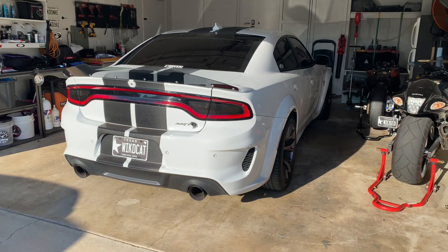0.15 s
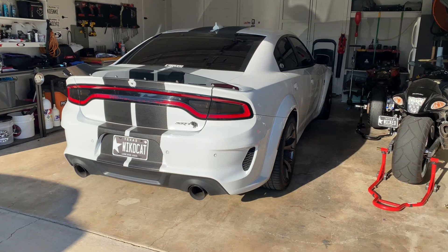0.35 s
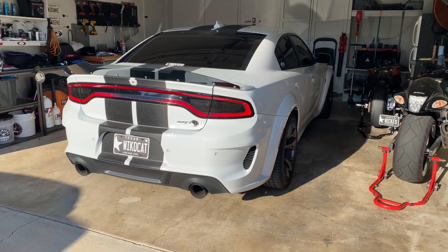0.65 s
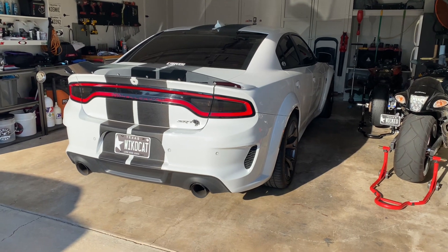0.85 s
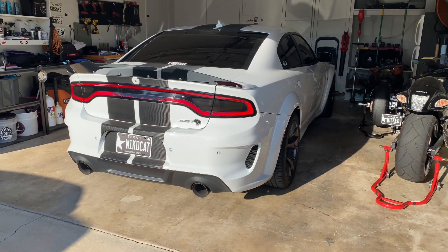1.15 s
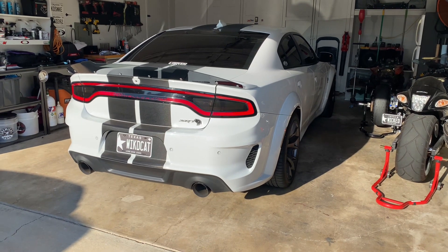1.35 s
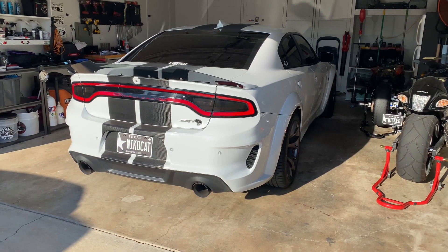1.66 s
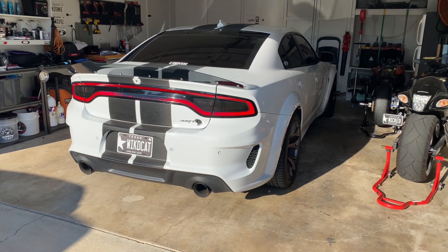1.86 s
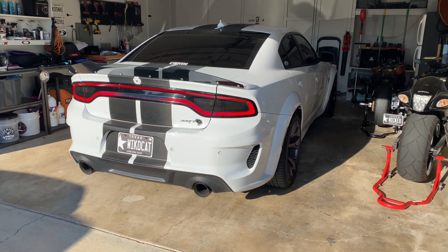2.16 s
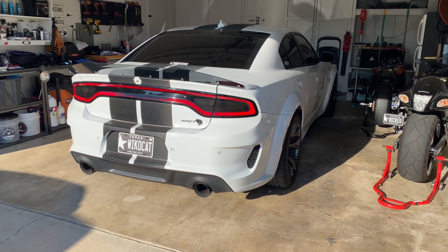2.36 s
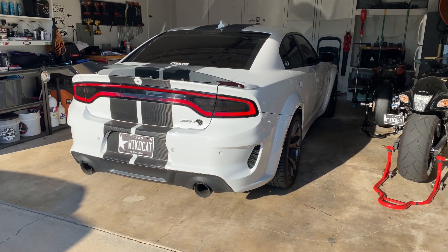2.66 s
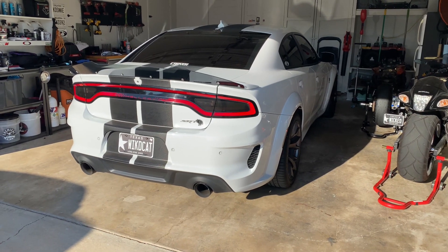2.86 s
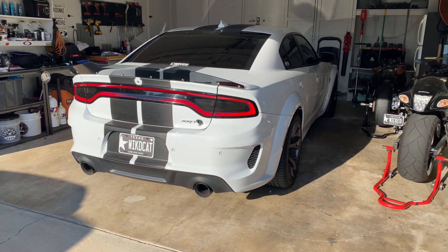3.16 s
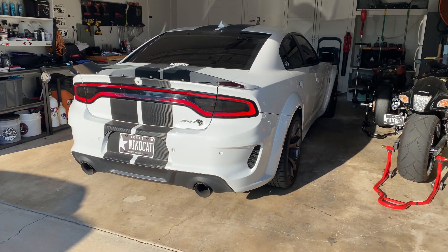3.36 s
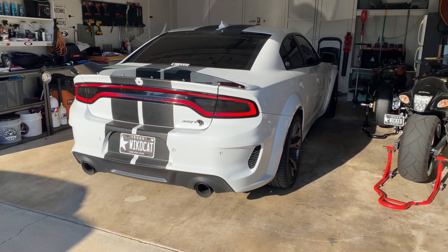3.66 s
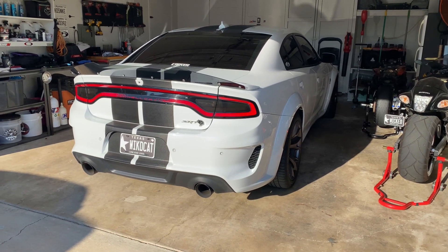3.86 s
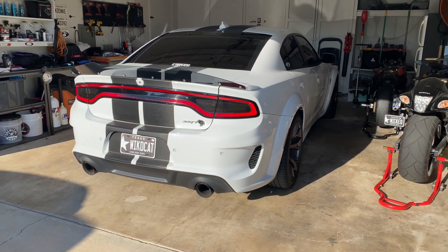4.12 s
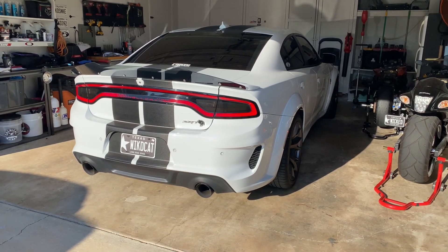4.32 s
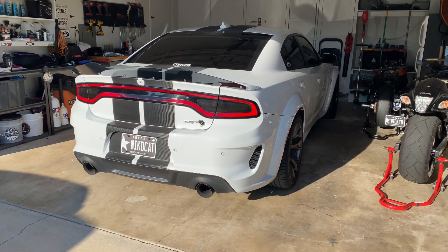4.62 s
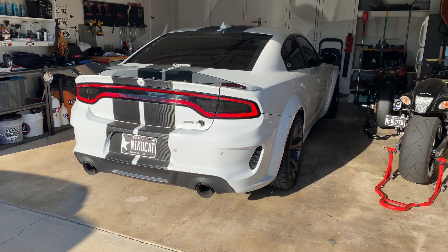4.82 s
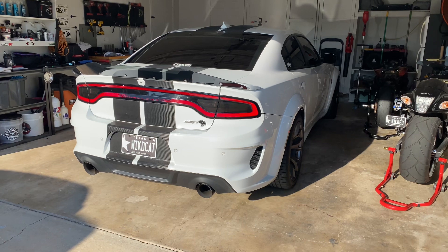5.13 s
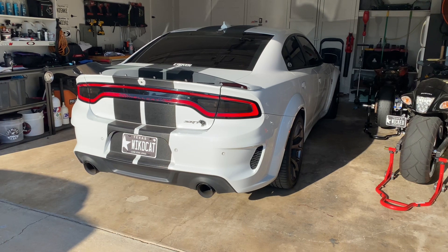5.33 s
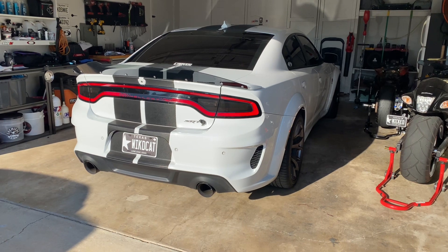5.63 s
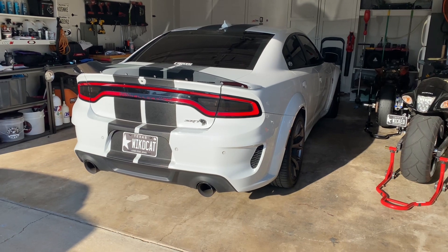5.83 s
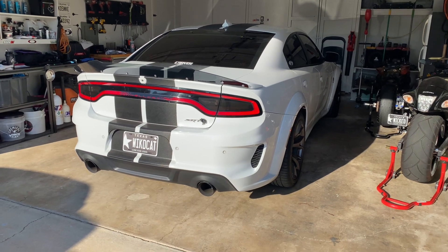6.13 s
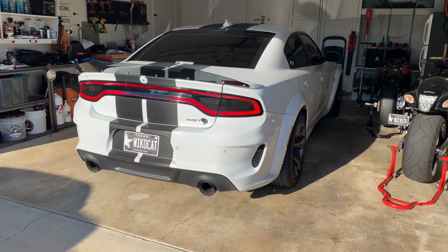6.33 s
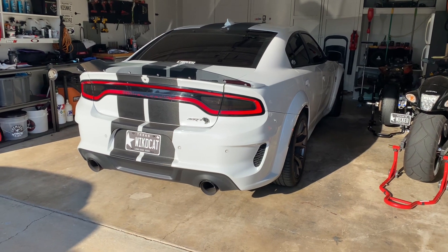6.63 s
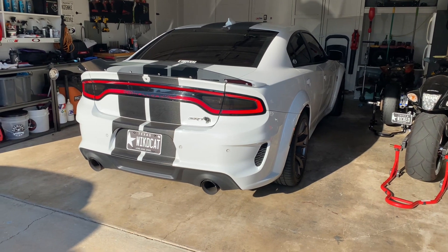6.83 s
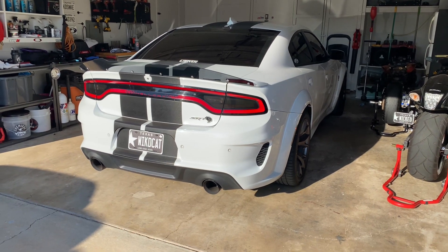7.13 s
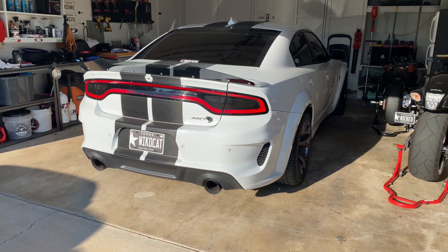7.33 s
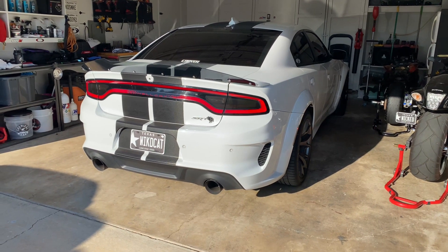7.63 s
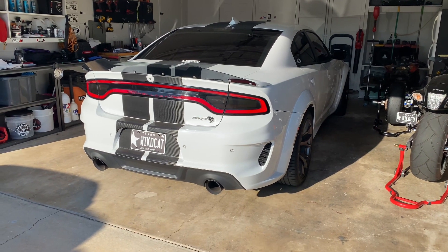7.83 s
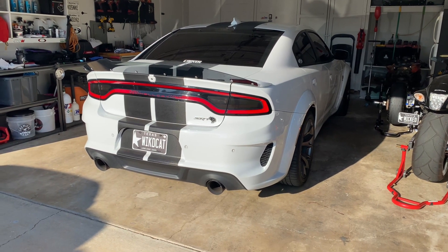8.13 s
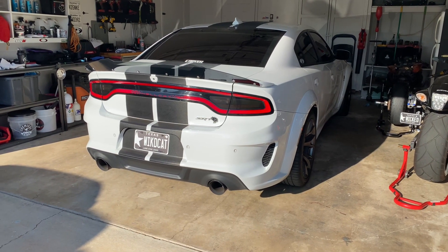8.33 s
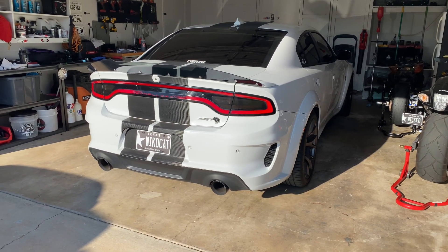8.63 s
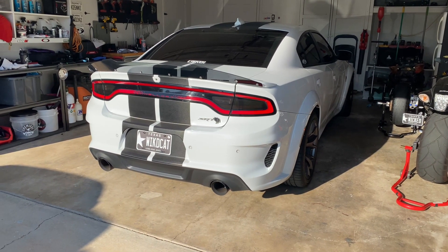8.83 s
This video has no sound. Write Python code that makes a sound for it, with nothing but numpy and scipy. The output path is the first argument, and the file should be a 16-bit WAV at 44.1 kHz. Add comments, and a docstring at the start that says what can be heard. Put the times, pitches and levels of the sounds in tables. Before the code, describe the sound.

A starter whines and chugs for half a second before a big V8 car engine catches. The revs flare with a raspy bark, sharp exhaust snaps and a rush of gas, then ease down over a few seconds. A deep, loping fast idle carries on, with dull pops that come thickly at first and later only now and then. It is heard from close behind the tailpipes at an open garage door.

```python
"""A big V8 cranks, catches, flares and settles to a fast idle, heard behind twin tailpipes at a garage door.
Each firing feeds a deep drone, a thud and a raspy crack in the pipes, over a rush of gas;
the eight cylinders are unequal, so the beat lopes. The starter chugs and whines first,
the hardest firings of the catch snap at the tips, and the cold mixture pops now and then."""
import sys
import numpy as np
from scipy import signal
from scipy.fft import rfft, irfft, next_fast_len
from scipy.io import wavfile
from scipy.ndimage import uniform_filter1d

SR = 44100
rng = np.random.default_rng(int(sys.argv[2]) if len(sys.argv) > 2 else 0)


def inscribe(sig):
    """Save sig as 16-bit PCM at rate SR to the path in sys.argv[1].

    A 1-D sig is mono; a 2-D sig holds one channel per row.
    Samples are clipped to [-1, 1] before scaling.
    """
    pcm = np.round(np.clip(np.atleast_2d(sig).T, -1, 1) * 32767)
    wavfile.write(sys.argv[1], SR, pcm.astype(np.int16))


N = 396018
T = np.arange(N) / SR
BINS_HZ = np.fft.rfftfreq(8192, 1 / SR)
FIRINGS = np.arange(1200)
SETTLE_S, SETTLE_FADE_S = 2.92, 0.89
SETTLED = np.clip((T - SETTLE_S) / SETTLE_FADE_S, 0, 1)


def gain_of(db):
    """Decibels to amplitude."""
    return 10 ** (np.asarray(db) / 20)


def unit_rms(x):
    """Scales to rms 1."""
    return x / np.sqrt(np.mean(x ** 2) + 1e-20)


def curves(rows):
    """Each column of a time table, per sample."""
    time_s, *columns = np.transpose(rows)
    return [np.interp(T, time_s, column) for column in columns]


def spectrum(rows, hz=BINS_HZ, column=1):
    """One column of a frequency table, on a log axis."""
    table = np.transpose(rows)
    return np.interp(np.log(hz + 1), np.log(table[0] + 1), table[column])


def colour(x, db):
    """Causal filter with gains db at BINS_HZ."""
    log_gain = np.log(gain_of(np.maximum(db, -100)))
    log_gain = np.r_[log_gain, log_gain[-2:0:-1]]
    taps = np.fft.ifft(np.exp(np.conj(signal.hilbert(log_gain)))).real[:4096]
    return signal.oaconvolve(np.atleast_2d(x), taps[None], axes=1)[:, :N]


def strike(x, rows):
    """Colours x; a unit click peaks at 1."""
    db = spectrum(rows)
    return colour(x, db) / abs(colour(signal.unit_impulse(4096), db)).max()


def brighten(x, hz, db):
    """High shelf above hz."""
    treble = signal.sosfiltfilt(signal.butter(2, hz, "high", fs=SR, output="sos"), x)
    return x - treble + gain_of(db) * treble


def clicks(turns, sizes):
    """One click per whole turn, each with its own size."""
    count = np.floor(np.maximum.accumulate(turns)).astype(int)
    return np.diff(count, prepend=count[0]) * sizes[count.clip(0)]


def impulses(rows):
    """One impulse per timed level."""
    time_s, db = np.transpose(rows)
    train = np.zeros(N)
    train[np.round(time_s * SR).astype(int)] = gain_of(db)
    return train


# Scatter off tips and walls: (frequency [Hz], unshared power [fraction])
DIFFUSE = [(150, 0.013), (250, 0.054), (450, 1), (750, 0.98), (1150, 0.17), (1500, 0.63), (2300, 0.2),
           (4000, 0.76), (6500, 0.45), (8000, 0.047), (12000, 0.15)]


def turbulence():
    """White noise for two ears, partly shared."""
    size = next_fast_len(N)
    share = np.clip(spectrum(DIFFUSE, np.fft.rfftfreq(size, 1 / SR)), 0, 1)
    both, *apart = rfft(rng.standard_normal((3, size)))
    return irfft(np.sqrt(1 - share) * both + np.sqrt(share) * np.array(apart), size)[:, :N]


# Pinion whines: (start [s], length [s], level [dB], tooth rate [Hz])
WHINES = [(0, 0.029, -44, 780), (0.046, 0.071, -42, 1010), (0.161, 0.063, -39, 1040),
          (.255, .05, -47, 1220), (0.336, 0.052, -42, 1190)]
HARMONICS_DB, WHINE_BLUR_HZ = [-1, 5, -12, -1], 90


def pinion_whine():
    """Blurred harmonics of the tooth rate swell with each compression."""
    out, t = np.zeros(N), T[:SR // 2]
    blur = signal.butter(2, WHINE_BLUR_HZ, fs=SR)
    for start_s, length_s, db, hz in WHINES:
        a, b = signal.lfilter(*blur, rng.standard_normal((2, len(HARMONICS_DB), len(t))))
        phase = 2 * np.pi * hz * t * np.arange(1, len(HARMONICS_DB) + 1)[:, None]
        tones = unit_rms(gain_of(HARMONICS_DB) @ (a * np.cos(phase) + b * np.sin(phase)))
        out[:len(t)] += gain_of(db) * tones * np.sin(np.pi * np.clip((t - start_s) / length_s, 0, 1))
    return out


# Cranking: (time [s], pumped air [dB], gear noise [dB])
CRANK = [(0, -39, -40.5), (.045, -47, -39), (.09, -47, -36), (.145, -34, -40), (.19, -38, -37),
         (.24, -42, -38.5), (.29, -41, -34), (.325, -45, -38.5), (.37, -35, -36), (.43, -37, -36.5)]
# Air and gear spectra: (frequency [Hz], gain [dB])
PUMPING = [(18, -39), (30, -13), (54, -1), (119, -8), (291, -19), (419, -34), (500, -23), (650, -43),
           (1100, -120)]
GEARS = [(350, -66), (600, -12), (770, -1.5), (908, -13), (943, -2.5), (1480, -4), (2080, -3), (2480, -7),
         (4480, -6.5), (8390, -19.5), (9400, -17), (12100, -19.5), (14000, -38), (15700, -58),
         (22000, -120)]
# Compression strokes: (time [s], level [dB], pitch [Hz])
CHUGS = [(0.039, -36, 90), (0.134, -37, 113), (0.159, -35, 56.5), (0.263, -25.5, 110), (0.348, -42, 77)]


def starter():
    """Pistons chug and pump air, gears grind, until the catch."""
    air_db, gear_db = curves(CRANK)
    air = gain_of(air_db) * unit_rms(colour(turbulence(), spectrum(PUMPING)))
    air *= np.clip((.44 - T) / 0.023, 0, 1)
    gears = gain_of(gear_db) * unit_rms(colour(turbulence(), spectrum(GEARS)))
    gears *= np.clip((.48 - T) / 0.049, 0, 1)
    start_s, db, hz = np.transpose(CHUGS)[:, :, None]
    age_s = np.maximum(T - start_s, 0)
    chugs = gain_of(db) * age_s / 0.013 * np.exp(1 - age_s / 0.0079) * np.sin(2 * np.pi * hz * age_s)
    return air + gears + chugs.sum(0)


# Hard firings: (time [s], level [dB])
SNAPS = [(.553, -21), (.577, -23), (.601, -19), (0.6105, -16), (0.615, -28), (0.623, -19), (0.631, -22),
         (.642, -18), (.678, -16), (.687, -17), (.712, -14), (.722, -25), (0.747, -14), (0.754, -14),
         (0.76, -18), (.779, -19), (.787, -21), (.811, -19), (.82, -21), (.843, -17.5), (0.881, -21),
         (.938, -32)]
# Snap spectrum: (frequency [Hz], gain [dB])
SNAP_COLOUR = [(500, -34), (1000, -13), (1500, 11), (2500, -0.5), (3100, -11.5), (3700, -13), (4800, -11),
               (5600, -43), (12000, -73)]


def snaps():
    """Hard firings click at the tips, with a brief spray."""
    train = impulses(SNAPS)
    spray = signal.oaconvolve(train, 0.26 * np.exp(-T[:900] / 0.0045))[:N] * turbulence()
    return strike(train + spray, SNAP_COLOUR)


# Fuel pops: (time [s], level [dB])
POPS = [(1.393, -11), (1.827, -16), (1.865, -16), (1.995, -13.5), (2.14, -19), (2.271, -16), (2.316, -16),
        (2.379, -14), (2.46, -15), (2.628, -12.5), (2.761, -15), (2.828, -22), (2.982, -21), (3.032, -6),
        (3.056, -12), (3.119, -6), (3.172, -5), (3.225, 0), (3.348, -8), (3.379, -6.5), (3.455, -5.5),
        (3.493, -10), (3.537, -3.5), (3.604, -2.5), (3.616, -15), (3.659, -9), (3.729, -10.5), (3.79, -16),
        (4.196, -3.5), (4.641, -8.5), (4.698, -6), (4.85, -5), (4.882, -3), (5.206, -6.5), (6.986, -0.5),
        (6.999, -7), (7.029, -12), (7.326, -5.5), (7.497, -8), (7.564, -10), (8.169, -7), (8.78, -2.5)]
# Pop spectrum: (frequency [Hz], gain [dB])
POP_COLOUR = [(30, -20), (60, 13), (150, 6.5), (300, 4.5), (450, -2), (700, -14.5), (1500, -65.5)]
# Pop brightness: (time [s], shelf [dB])
POP_SHELF = [(1.4, 1), (1.9, 9), (2.5, 4.5), (3, -6), (3.7, -4), (4.1, -12), (8.98, -12)]


def pops():
    """Unburnt fuel bangs in the silencers: a dull blow, then a burble."""
    train, t = impulses(POPS), T[:3000]
    tail = 0.085 * np.minimum(t / 0.004, 1) * np.exp(-t / 0.011)
    burble = signal.oaconvolve(train, tail)[:N] * rng.standard_normal(N)
    return -brighten(strike(.45 * train + burble, POP_COLOUR), 417, curves(POP_SHELF)[0])


# Gas rush spectrum: (frequency [Hz], gain [dB])
HISS_COLOUR = [(1060, -18.5), (1800, 2.5), (1980, -6.5), (2210, -1), (2460, -5), (2950, -10.5), (4910, -11),
               (5580, -16.5), (6140, -14), (7140, -14.5), (8240, -21), (10500, -16), (12100, -19.5),
               (14000, -37), (15700, -76), (22000, -120)]
HISS_DB, WARMING_DB_PER_S = -42.5, 0.3528
FLARE_DB, FLARE_END_S, FLARE_DECAY_S = 14, 0.71, 0.47


def hiss(flutter, bark_db):
    """Gas rushes from the tips: loud in the flare, creeping up as the pipes warm."""
    flare_db = FLARE_DB * np.exp(-np.maximum(T - FLARE_END_S, 0) / FLARE_DECAY_S)
    rush = colour((1.1 + 0.25 * flutter) * turbulence(), spectrum(HISS_COLOUR))
    rush /= np.sqrt(uniform_filter1d(rush ** 2, 8000) + 1e-12)
    return gain_of(HISS_DB + flare_db + WARMING_DB_PER_S * T + 0.27 * bark_db) * rush


def cracks(blast_turns, cylinder_db, chance):
    """Thin cracks recur each cycle, so the pipes sing narrow lines."""
    creep = (FIRINGS % 8) / 89  # each cylinder earlier than the last
    crack_turns = np.interp(blast_turns, FIRINGS - creep + 0.01 * chance[:, 3], FIRINGS)
    train = clicks(crack_turns, gain_of(1.37 * cylinder_db + 1.3 * chance[:, 0]))
    highpass = signal.butter(6, 1010, "high", fs=SR, output="sos")
    thin = signal.sosfilt(highpass, uniform_filter1d(train, size=5))
    return gain_of(-5.5 + 0.5 * SETTLED) * unit_rms(brighten(thin, 1340, -10 + 4 * SETTLED))


# Tailpipe modes: (frequency [Hz], width [Hz], gain [dB])
PIPE_MODES = [(625, 140, -1), (809, 190, -1.5), (1025, 26, -0.5), (1284, 120, -8), (1423, 47, -3.5),
              (1506, 100, -4.5), (1634, 61, -4.5), (2474, 460, -16.5)]
# Main mode by cylinder: (frequency [Hz])
MAIN_MODE_HZ = [1200, 1215, 1160, 1125, 1115, 1155, 1200, 1185]
UPPER_DRIVE_DB = [5, 5, -9, 2, -11, -11, 3.5, -1]
MAIN_WIDTH_HZ, MAIN_DB = 112, 3


def pipe_db(cylinder):
    """Each cylinder's path sets its main mode and its drive of the upper ones."""
    modes = [(hz, width, db + UPPER_DRIVE_DB[cylinder] * (1250 < hz < 2000))
             for hz, width, db in PIPE_MODES]
    modes.append((MAIN_MODE_HZ[cylinder], MAIN_WIDTH_HZ, MAIN_DB))
    power = sum(gain_of(db) ** 2 / (1 + (2 * (BINS_HZ - hz) / width) ** 2) ** 2.07
                for hz, width, db in modes)
    return 10 * np.log10(power)


# Roar under load: (frequency [Hz], gain [dB])
ROAR_COLOUR = [(290, -14), (500, 5.5), (754, -18), (834, 14), (960, -5.5), (1180, 5), (1630, 10.5),
               (1940, -33), (2490, 1), (2870, -21), (5500, -42), (7150, -59), (12100, -120)]


def rasp(blast, blast_turns, load):
    """Blasts ring the pipe modes; load adds a broader roar."""
    cylinder = (blast_turns + .1).astype(int) % 8
    ring = sum(colour(blast * (cylinder == c), pipe_db(c)) for c in range(8))
    roar = colour(blast, spectrum(ROAR_COLOUR))
    ring, roar = (x / np.std(x[:, N // 2:]) for x in (ring, roar))
    share = 0.65 * load
    return np.sqrt(1 - share) * ring + np.sqrt(share) * roar


# Blast lag: (time [s], delay [firings])
BLAST_LAG = [(.6, .85), (.68, .55), (.75, .42), (.85, .35), (1.3, .45), (1.8, .6), (8.98, .55)]
UNLOAD_S, ROAR_FADE_S, BARK_FADE_S = .82, .22, .5
BARK_FROM_S, BARK_RISE_S, BARK_FIRING, BARK_FALL_DB = .55, .003, 2.25, 6.5


def tip_blasts(turns, level_db, cylinder_db, chance):
    """A crack and a puff per firing make rasp and hiss; under load they bark once a cycle."""
    load, barking = (np.clip(1 - (T - UNLOAD_S) / fade_s, 0, 1) for fade_s in (ROAR_FADE_S, BARK_FADE_S))
    blast_turns = turns - curves(BLAST_LAG)[0] + 8
    number, puff_age = blast_turns.astype(int), blast_turns % 1 / 0.21
    uneven = 0.6 + 0.15 * load
    size = gain_of(uneven * cylinder_db[number] + 1.2 * chance[number, 3])
    gust = np.where(T < BARK_FROM_S, 1.2, .3) + size * puff_age * np.exp(1 - puff_age)
    blast = cracks(blast_turns, cylinder_db, chance) + unit_rms(gust * turbulence())
    cycle = np.where(T < BARK_FROM_S, .5, (blast_turns - BARK_FIRING) % 8 / 8)
    bark_db = uniform_filter1d(-barking * BARK_FALL_DB * cycle, round(BARK_RISE_S * SR))
    return gain_of(level_db + bark_db) * rasp(blast, blast_turns, load) + hiss(uneven * gust, bark_db)


# Silencer response: (frequency [Hz], gain [dB])
THUD_COLOUR = [(27, -67.5), (47, -8.5), (90, -6.5), (150, -3), (210, 1), (245, -9.5), (283, -2.5),
               (318, -19), (346, -7), (370, -15), (398, -16.5), (425, -14), (470, -22), (530, -25),
               (650, -35.5), (900, -64), (2500, -100)]
JITTER_FIRINGS, STUMBLE_FIRINGS = .02, .035


def thuds(turns, scatter_db, shelf_db, cylinder_db, lag, chance):
    """Unequal pressure pulses cross the silencers; gas burbles between them."""
    jitter = JITTER_FIRINGS + STUMBLE_FIRINGS * np.interp(FIRINGS, turns, 1 - SETTLED)
    thud_turns = np.interp(turns + .26, FIRINGS + lag + jitter * chance[:, 1], FIRINGS)
    burn_db = abs(scatter_db) * chance[thud_turns.astype(int), 2].clip(-2.5, 1.3)
    blows = clicks(thud_turns, gain_of(cylinder_db)) * gain_of(burn_db)
    muffled = colour(unit_rms(blows) + .3 * turbulence(), spectrum(THUD_COLOUR))
    return gain_of(-0.36 * shelf_db) * brighten(unit_rms(muffled), 298, shelf_db)


# Growl orders: (frequency [x firing rate], level [dB])
GROWL_ORDERS = [(2, -34), (21 / 8, -41), (22 / 8, -39), (3, -36)]
# Silencer modes: (frequency [Hz], width [Hz], gain [dB])
SILENCER_MODES = [(227, 22, -4.5), (266, 21, -1.5), (342.8, 22, 1)]


def growl(turns, rate_hz, swell_db):
    """Engine orders swell as they pass the silencer modes, until the idle settles."""
    out = np.zeros(N)
    for order, db in GROWL_ORDERS:
        resonance = sum(gain_of(mode_db) / (1 + (2 * (order * rate_hz - hz) / width) ** 2)
                        for hz, width, mode_db in SILENCER_MODES)
        out += gain_of(db + 1.5 * swell_db - 3) * resonance * np.cos(2 * np.pi * order * turns)
    return np.sqrt(2) * out * np.clip((T - .6) / .2, 0, 1) * (1 - SETTLED)


# Idle overtones: (frequency [x firing rate], level re drone [dB], phase [turns])
OVERTONES = [(4, -34, 0.57), (5, -39, 0.14), (6, -47, 0.39)]


def drone(turns, level_db, swell_db, chance):
    """The pipes resonate at the firing rate; at idle the silencers add overtones."""
    wobble = np.interp(turns, FIRINGS, 0.032 * chance[:, 1])
    fundamental = gain_of(swell_db) * np.cos(2 * np.pi * (turns + wobble))
    overtones = sum(gain_of(db) * np.cos(2 * np.pi * (order * turns + phase))
                    for order, db, phase in OVERTONES)
    return np.sqrt(2) * gain_of(level_db) * (fundamental + gain_of(1.17 * swell_db) * SETTLED * overtones)


# Revs: (time [s], firing rate [Hz])
REVS = [(0.42, 23.52), (0.46, 50.8), (0.5, 51.11), (0.56, 82.35), (0.6, 85.22), (0.64, 100.47),
        (0.7, 116.4), (0.76, 118.14), (0.85, 126.84), (0.97, 130.07), (1.12, 132.36), (1.3, 128.81),
        (1.55, 121.34), (2.0, 116.7), (2.75, 109.64), (3.3, 107.53), (4.0, 106.28), (4.9, 106.14),
        (5.6, 106.77), (6.8, 105.64), (7.6, 105.9), (8.98, 105.56)]
# Exhaust mix: (time [s], drone [dB], thud [dB], thud scatter [dB], thud shelf [dB], rasp [dB])
EXHAUST_MIX = [(.42, -1, -35, 3.5, -10, -42), (.442, -19, -22, 4, -2, -21), (.46, -30, -25, 4, -1, -31),
               (.49, -13.5, -22, 3, -14, -31.5), (.51, -14.5, -29.5, -6.5, -20, -26.5),
               (.545, -34, -33, -2.5, -8, -28), (.56, -25, -28, -6, -3, -22),
               (.58, -15.5, -26, 9.5, -7, -18.5), (.63, -10.5, -24.5, 0, -5, -21.5),
               (.68, -12.5, -25.5, 0.5, 3, -19.5), (.75, -10, -23, 3, 10, -18), (.8, -14, -25, 1.5, 3, -18),
               (1.05, -18, -31, 7.5, -2, -23.5), (1.3, -17, -28.5, 9, -7, -30),
               (1.8, -12.5, -23, -0.5, 0, -30), (2.12, -11, -29, 5, 17, -29),
               (2.3, -11.5, -22.5, -4, 14, -29.5), (2.8, -13.5, -27.5, 8.5, 6.5, -30),
               (3.4, -13.5, -20.5, 6.5, -.5, -30.5), (3.9, -12, -22.5, 8.5, -0.5, -32),
               (4.5, -11, -19.5, 1, 0.5, -31.5), (6, -11, -19.5, 1.5, 1, -31.5),
               (8.98, -10.5, -19.5, 4, 2.5, -30)]
# Cylinders in firing order: (drone [dB], thud [dB], thud lag [firings], rasp [dB])
CYLINDERS = [(2.3, -0.5, -0.0044, 4), (0.8, 0, -0.022, -1.5), (4, -3, 0.037, 8.5), (-1.2, -1, 0.3, 2.5),
             (1.3, 0, -0.027, 7.5), (4.5, -3.5, -0.063, 6), (4.2, 2.5, -0.005, 5.5), (2, -1, 0.0081, 4)]


def exhaust():
    """Eight unequal cylinders drive the pipes, one turn of phase per firing."""
    catch_s, rate_hz = REVS[0][0], curves(REVS)[0]
    turns = np.cumsum(np.where(T < catch_s, 0, rate_hz)) / SR
    drone_db, thud_db, scatter_db, shelf_db, rasp_db = curves(EXHAUST_MIX)
    cyl_drone_db, cyl_thud_db, lag, cyl_rasp_db = np.array(CYLINDERS)[FIRINGS % 8].T
    chance = rng.standard_normal((len(FIRINGS), 4))
    swell_db = np.interp(turns, FIRINGS, cyl_drone_db + 0.63 * chance[:, 0])
    out = drone(turns, drone_db, swell_db, chance) + growl(turns, rate_hz, swell_db)
    out = out + gain_of(thud_db) * thuds(turns, scatter_db, shelf_db, cyl_thud_db, lag, chance)
    out += tip_blasts(turns, rasp_db, cyl_rasp_db, chance)
    return out * np.clip((T - catch_s) / 0.058, 0, 1)


def scene():
    """Engine and starter."""
    return exhaust() + pops() + snaps() + starter() + pinion_whine()


# Microphone pair: (frequency [Hz], left lead [rad], left minus right [dB])
MIC_PAIR = [(300, 0, -.5), (450, .6, -2), (800, 1.1, -2.5), (1250, 1.5, -1.5), (1550, .1, -.5),
            (2300, .4, .5), (3100, 2.1, 3), (4200, .7, 2), (6900, 0, 0), (7900, -2.8, 0), (8800, -3.5, 0),
            (10500, -2 * np.pi, 0), (11500, -2 * np.pi, 0), (12300, -3 * np.pi, 0)]
# Bass drifting to the centre: (time [s], right lead at 106 Hz [rad], left minus right [dB])
BASS_IMAGE = [(0, 1.1, -.3), (.6, .7, -.5), (1.1, 1.12, -2.2), (3.1, 1.1, -1.8), (3.7, .75, -.2),
              (4.3, .4, 0), (8.98, .39, 0)]
BASS_HZ, EDGE_HZ = 480, 14700


def record(dry):
    """Two microphones differ in phase and balance; peaks round off, then a band limit."""
    hz, t, bins = signal.stft(dry, SR, nperseg=2048, noverlap=1536)
    hz = hz[:, None]
    time_s, bass_rad, bass_db = np.transpose(BASS_IMAGE)
    bass = 1 / (1 + (hz / BASS_HZ) ** 4)
    bass_lead_rad = (hz / 106 + .35) ** .8 / 1.27 * np.interp(t, time_s, bass_rad)
    lead_rad = spectrum(MIC_PAIR, hz) - bass * bass_lead_rad
    tilt_db = spectrum(MIC_PAIR, hz, column=2) * (1 - bass) + bass * np.interp(t, time_s, bass_db)
    left = np.exp(.5j * lead_rad) * gain_of(tilt_db / 2)
    pair = np.array([left, 1 / left])
    pair /= abs(pair.mean(0)).clip(.6)  # holds the centre level
    out = signal.istft(bins * pair, SR, nperseg=2048, noverlap=1536)[1][:, :N]
    excess = np.maximum(abs(out) - .75, 0)
    out -= np.sign(out) * (excess - .2 * np.tanh(excess / .2))
    lowpass = signal.firwin(1023, EDGE_HZ, window=("kaiser", 9), fs=SR)
    return signal.oaconvolve(out, lowpass[None], "same")


dry = scene()
out = record(dry)
inscribe(out)
```